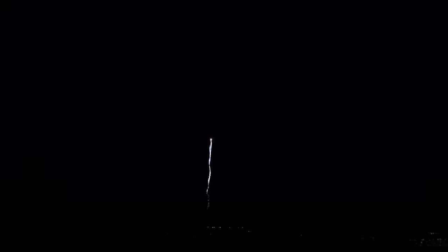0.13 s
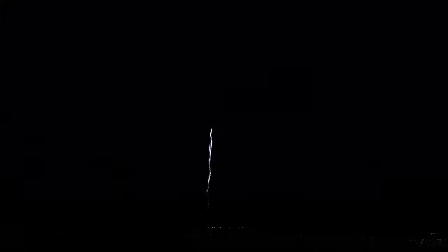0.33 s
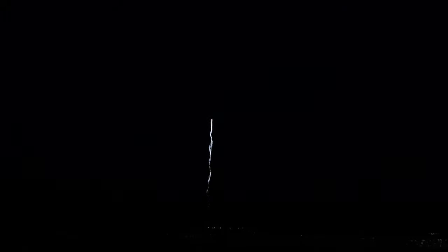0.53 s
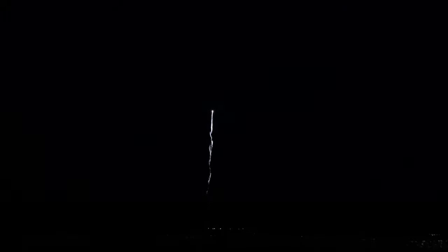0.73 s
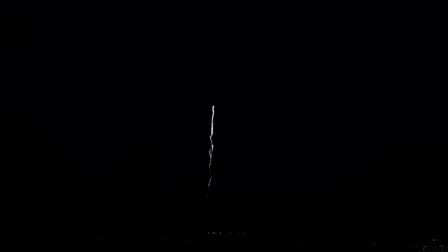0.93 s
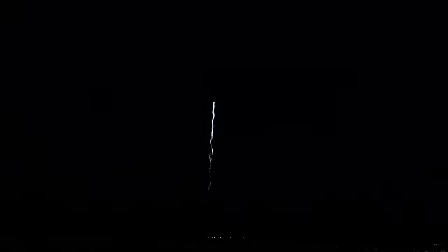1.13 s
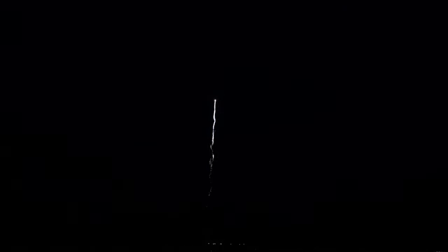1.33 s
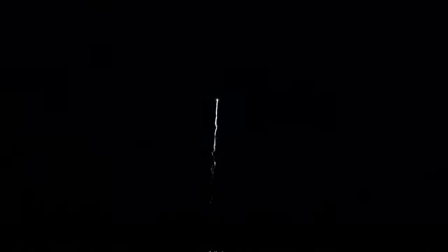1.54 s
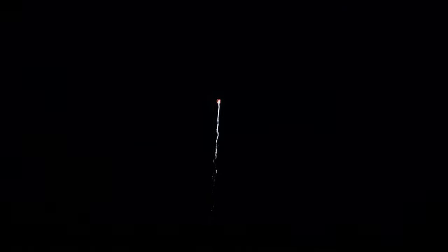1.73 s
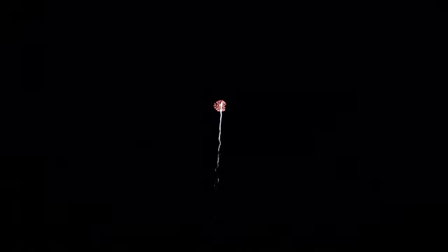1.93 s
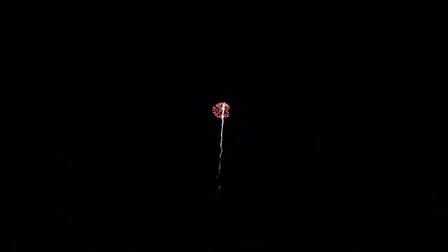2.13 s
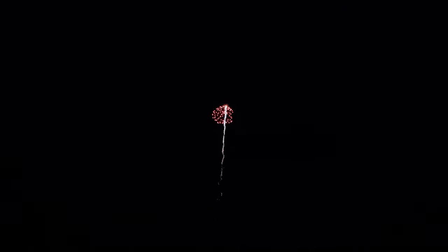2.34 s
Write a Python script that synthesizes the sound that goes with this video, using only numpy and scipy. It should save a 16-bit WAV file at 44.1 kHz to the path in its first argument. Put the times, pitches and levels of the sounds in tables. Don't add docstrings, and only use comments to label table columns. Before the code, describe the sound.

A distant firework mortar fires with a sharp cracking boom, then echoes roll away outdoors

```python
import sys
import numpy as np
from scipy import signal
from scipy.fft import rfft, irfft, next_fast_len
from scipy.io import wavfile
from scipy.ndimage import uniform_filter1d, map_coordinates

SR = 44100
rng = np.random.default_rng(int(sys.argv[2]) if len(sys.argv) > 2 else 0)


def inscribe(sig):
    pcm = np.round(np.clip(np.atleast_2d(sig).T, -1, 1) * 32767)
    wavfile.write(sys.argv[1], SR, pcm.astype(np.int16))


def undo_db(level):
    steps = np.asarray(level, float) / 20
    return 10 ** steps


N = 105840
T = np.arange(N) / SR

# (time [s], peak level [dB])
AIR_FRONTS = [(.2417, -17), (.2427, -16), (.2440, -5), (.2453, -8), (.2469, -6), (.2482, -4), (.2490, -5),
              (.2502, -12), (.2514, -17), (.2522, -1), (.2531, -3), (.2544, -11), (.2571, -10),
              (.2585, -15), (.2597, -16)]
# (time [s], bright level [dB], bright
# centre [Hz], thump level [dB], thump pitch [Hz])
REFLECTORS = [(.039, -39.5, 1460, -33, 173), (0.319, -47.5, 1400, -14, 139), (.346, -38.5, 1360, -29, 119),
              (0.388, -28, 1500, -16.5, 183.6), (0.421, -32.5, 2000, -26, 144), (0.512, -51, 932, -27, 121),
              (.546, -37, 1080, -19, 127.5), (.591, -27, 640, -21, 91.5), (.666, -22, 1060, -17, 180),
              (.673, -21, 710, -31, 121), (0.624, -43, 1200, -27, 62.5), (0.721, -35, 1000, -38, 161.3),
              (0.839, -39.5, 900, -23.5, 60.6), (0.895, -36.5, 900, -29, 89.4),
              (0.951, -53, 900, -34.5, 103), (1.105, -37.5, 1500, -37, 121), (1.312, -37.5, 1400, -38, 150),
              (1.330, -34, 1500, -30, 131), (1.37, -31, 1260, -28.5, 66), (1.521, -43, 1400, -28, 105.6),
              (1.653, -34, 1240, -48, 147), (1.694, -39.5, 1500, -36, 142), (1.769, -35, 654, -30.5, 133.5),
              (2.002, -38, 800, -36, 130)]
# (time [s], level [dB], rise [s], T60 [s])
SLOPE_SWELLS = [
    (0.26, -39, .004, 1.2),
    (.345, -48, .01, .4),
    (.385, -38, .012, 0.83),
    (.51, -48.5, 0.018, 0.66),
    (0.548, -34.5, .01, 0.85),
    (.60, -44.5, .02, 1.7),
    (.90, -45, .02, 1.1),
    (1.10, -52, .04, 0.56),
    (1.33, -45.5, .04, 0.96),
    (1.65, -64, .02, 1.),
]
# (frequency [Hz], density [dB per Hz])
ROLL_SPECTRUM = [(12, -43), (20, -3), (49, 0), (183, 0.5), (238, -6), (304, -17.5), (338, -34),
                 (450, -39.5), (580, -58), (990, -120)]
# (frequency [Hz], density [dB per Hz])
SCATTER_SPECTRUM = [(210, -47), (350, -13), (620, -7), (1300, -6.5), (2140, -13), (4280, -30.5),
                    (6000, -59), (7600, -60.5), (11000, -89.5)]
# (frequency [Hz], density [dB per Hz])
SHEEN_SPECTRUM = [(1200, -30), (2500, 1.5), (4500, -7.5), (6500, -22), (8000, -44), (11000, -88.5)]
# (frequency [Hz], density [dB per Hz])
RUMBLE_SPECTRUM = [(12, -42), (22, -15), (59, 0), (90, -7.5), (151, -5), (270, -11.5), (400, -21.5),
                   (1000, -35), (1600, -66)]
# (frequency [Hz], density [dB per Hz])
HISS_SPECTRUM = [(300, -19.5), (800, -8), (1500, 0.5), (3200, -7), (4300, -15), (6300, -26), (10000, -44),
                 (13000, -49.5), (16000, -85)]
# (frequency [Hz], correlation [-1 to 1])
PORT_LIKENESS = [(60, 0.99), (110, 0.99), (200, 0.99), (360, 0.93), (650, 0.88), (1170, 0.48),
                 (2120, 0.063), (3830, -0.58)]

FRONT_HZ, FRONT_WIDTH_HZ = 1450, 650
FIZZ_DB, FIZZ_S, FIZZ_LENGTH_S, FIZZ_SPREAD_DB = -23, 0.250, 0.0055, -33
PUSH_DB, PUSH_S, PUSH_LENGTH_S = -9, 0.2466, 0.0019
SHOCK_DB, SHOCK_S, SHOCK_T60_S, SHOCK_TOP_HZ = -2, 0.25232, 0.0035, 3400
RING_DB, RING_S, RING_T60_S, RING_HZ = -3, 0.2516, 0.1, 172
GROUND_DB, GROUND_S, GROUND_RISE_S, GROUND_FADE_S = -3, 0.2502, 0.0013, 0.18
GROUND_END_HZ, GROUND_SAG_HZ, GROUND_SAG_S = 30, 200, 0.0071
LOW_HOLD_S, LOW_T60_S = 0.033, 0.03
ECHO_BRIGHT_S, ECHO_WIDTH = 0.013, 0.49
THUMP_LAG_S, THUMP_CYCLES = 0.007, 3.1
ROLL_START_S, ROLL_DB, ROLL_T60_S = 0.29, -25.5, 3.45
LONG_DB, LONG_T60_S = -51, 10.7
SHEEN_DB, SHEEN_LIFE = -11, 0.34
RUMBLE_DB, HISS_DB = -37, -60
AIR_TOP_HZ, PORT_LAG_S = 2740, 0.00004


def blast():
    fizz, stray = burning_fizz()
    wave = air_fronts() + undo_db(FIZZ_DB) * fizz + pressure_push_and_drop() + ring_and_ground_wave()
    return ports(wave, PORT_LAG_S) + undo_db(FIZZ_SPREAD_DB) * stray * [[1], [-1]]


def air_fronts():
    def pulse(f):
        high_pass = 1j * f / (250 + 1j * f)
        low_pass = 1 / (1 + 1j * f * FRONT_WIDTH_HZ / FRONT_HZ ** 2 - (f / FRONT_HZ) ** 2)
        return dulled(f) * high_pass * low_pass

    def arrivals(f):
        lead_s = 0.5 / FRONT_HZ
        return sum(undo_db(db) * np.exp(-2j * np.pi * f * (s - lead_s)) for s, db in AIR_FRONTS)

    click = np.eye(1, N)[0]
    return filtered(click, lambda f: arrivals(f) * pulse(f)) / filtered(click, pulse).max()


def burning_fizz():
    noise = rng.standard_normal((2, N))
    band = filtered(noise, lambda f: resonance(900, 1400)(f) * dulled(f))
    return unit(band) * bump(FIZZ_S, FIZZ_LENGTH_S)


def pressure_push_and_drop():
    t = np.clip(T - SHOCK_S, 0, None)
    step = -undo_db(SHOCK_DB - 60 * t / SHOCK_T60_S) * np.clip(t * SR, 0, 1)
    drop = filtered(step, lambda f: 1 / (1 + 1j * f / SHOCK_TOP_HZ) ** 2)
    return undo_db(PUSH_DB) * bump(PUSH_S, PUSH_LENGTH_S) + drop


def ring_and_ground_wave():
    t = np.clip(T - RING_S, 0, None)
    ring = -undo_db(RING_DB - 60 * t / RING_T60_S) * np.sin(2 * np.pi * RING_HZ * t)
    g = np.clip(T - GROUND_S, 0, None)
    cycles = GROUND_END_HZ * g + GROUND_SAG_HZ * GROUND_SAG_S * (1 - np.exp(-g / GROUND_SAG_S))
    envelope = undo_db(GROUND_DB - 60 * g / GROUND_FADE_S) * (1 - np.exp(-g / GROUND_RISE_S))
    ground = envelope * np.sin(2 * np.pi * cycles)
    return (ring + ground) * undo_db(-60 * np.clip(g - LOW_HOLD_S, 0, None) / LOW_T60_S)


def echoes():
    out = np.zeros((2, N + SR))
    t = np.arange(SR // 8) / SR
    age = t / ECHO_BRIGHT_S * 4
    envelope = age ** 2 * np.exp(2 - age) / 4
    for start_s, bright_db, hz, thump_db, thump_hz in REFLECTORS:
        band = resonance(hz, ECHO_WIDTH * hz)
        noise = rng.standard_normal((2, len(t)))
        common, stray = unit(filtered(noise, lambda f: band(f) ** 2 * dulled(f))) * envelope
        rattle = undo_db(bright_db - 10) * (common + 0.3 * stray * np.array([[1], [-1]]))
        cycles = np.clip(t - THUMP_LAG_S, 0, None) * thump_hz
        window = np.sin(np.pi * np.clip(cycles / THUMP_CYCLES, 0, 1))
        thump = undo_db(thump_db) * np.sin(2 * np.pi * cycles) * window
        i = round(start_s * SR)
        out[:, i:i + len(t)] += rattle + thump
    return out[:, :N]


def landscape():
    roll = undo_db(ROLL_DB + 1.7 * wobble(35)) * swell(ROLL_START_S, 0.016, ROLL_T60_S)
    power = (undo_db(LONG_DB) * swell(ROLL_START_S, 0.041, LONG_T60_S)) ** 2
    sheen = np.zeros(N)
    for s, db, rise, t60 in SLOPE_SWELLS:
        power += (undo_db(db) * swell(s - rise, rise, t60)) ** 2
        sheen += undo_db(db + SHEEN_DB) * swell(s - rise, rise, t60 * SHEEN_LIFE)
    scatter = np.sqrt(power) * undo_db(0.8 * wobble(30) + 1.2 * wobble(90))
    low = roll * rush(ROLL_SPECTRUM, patchy_db=0.7)
    bright = scatter * rush(SCATTER_SPECTRUM, patchy_db=1.2)
    return low + bright + sheen * rush(SHEEN_SPECTRUM, patchy_db=1.5)


def night():
    rumble = undo_db(RUMBLE_DB + 0.6 * wobble(12)) * rush(RUMBLE_SPECTRUM, patchy_db=0.6)
    hiss = undo_db(HISS_DB + 0.36 * wobble(8.7)) * rush(HISS_SPECTRUM, patchy_db=1.2)
    return rumble + hiss


def rush(spectrum, patchy_db):
    z = signal.stft(rng.standard_normal((2, N)), nperseg=512)[2]
    patches = uniform_filter1d(rng.standard_normal(z.shape[1:]), size=5, axis=0)
    patches = uniform_filter1d(patches, size=5, axis=1)
    pair = signal.istft(z * undo_db(patchy_db * unit(patches)), nperseg=512)[1][:, :N]

    def mid_side(hz):
        angle = np.arccos(np.clip(along(PORT_LIKENESS, hz), -1, 1)) / 2
        return undo_db(along(spectrum, hz)) * np.array([np.cos(angle), np.sin(angle)])

    mid, side = filtered(pair, mid_side)
    return unit(np.array([mid + side, mid - side]))


def ports(x, lag_s):
    sides = np.array([[1], [-1]])
    return filtered(np.array([x, x]), lambda f: np.exp(1j * np.pi * f * lag_s * sides))


def dulled(f):
    return 1 / (1 + 1j * f / AIR_TOP_HZ) ** 3


def resonance(hz, width_hz):
    return lambda f: 1j * f * width_hz / (hz * hz - f * f + 1j * f * width_hz)


def swell(start_s, rise_s, t60_s):
    t = np.clip(T - start_s, 0, None)
    return (1 - np.exp(-t / rise_s)) * undo_db(-60 * t / t60_s)


def bump(centre_s, length_s):
    return np.exp(-0.5 * ((T - centre_s) / length_s) ** 2)


def wobble(rate):
    knots = rng.standard_normal(int(N * 200 / SR) + 4)
    return map_coordinates(knots, [T * rate])


def filtered(x, response):
    n = x.shape[-1]
    m = next_fast_len(n + 8192)
    return irfft(rfft(x, m) * response(np.fft.rfftfreq(m, 1 / SR)), m)[..., :n]


def along(points, hz):
    f, v = np.transpose(points)
    return np.interp(np.log(hz + 1), np.log(f + 1), v)


def unit(x):
    return x / np.sqrt(np.mean(x ** 2) + 1e-20)


def scene():
    return blast() + echoes() + landscape() + night()


def roll_off(x):
    return signal.sosfilt(signal.butter(12, 16000, fs=SR, output="sos"), x)


def record(dry):
    hardness = 40
    clipped = dry / (1 + np.abs(dry) ** hardness) ** (1 / hardness)
    return roll_off(clipped)


dry = scene()
out = record(dry)
inscribe(out)
```